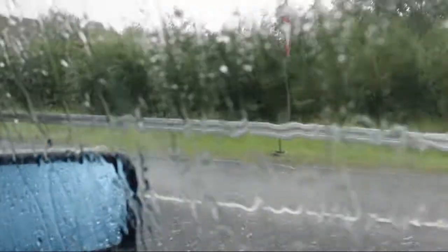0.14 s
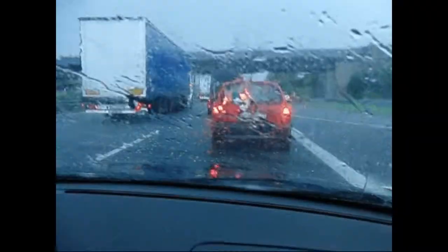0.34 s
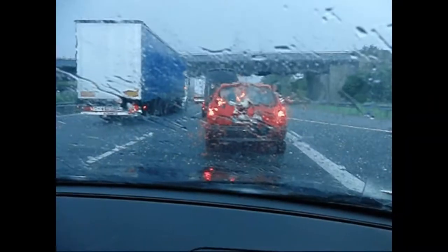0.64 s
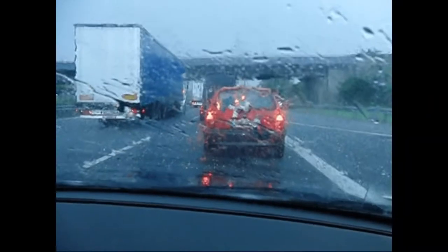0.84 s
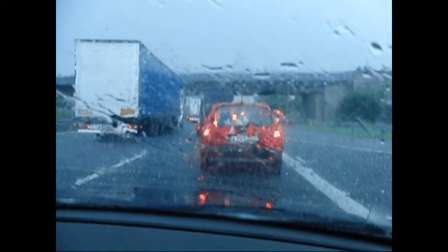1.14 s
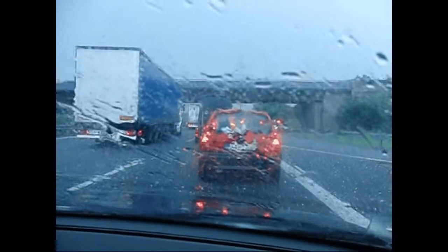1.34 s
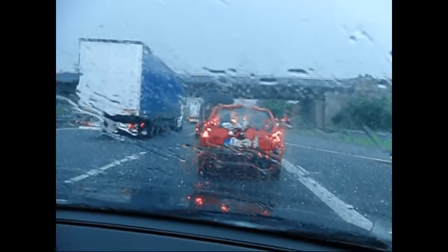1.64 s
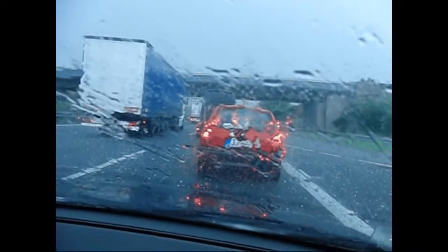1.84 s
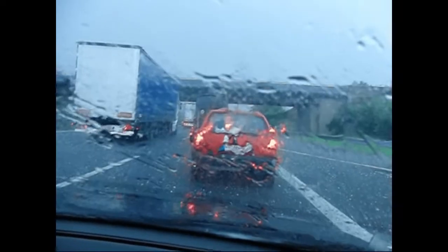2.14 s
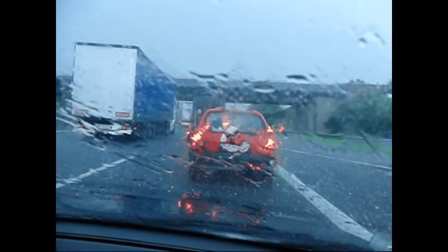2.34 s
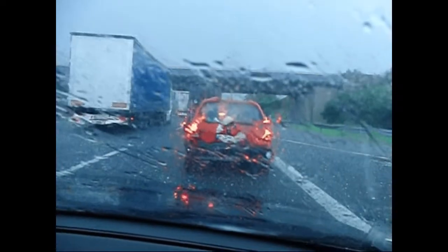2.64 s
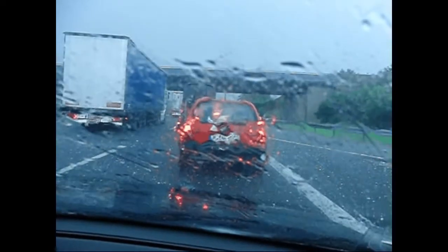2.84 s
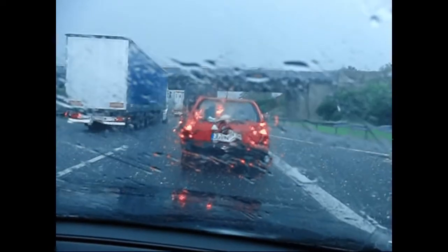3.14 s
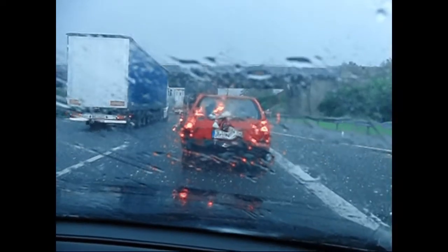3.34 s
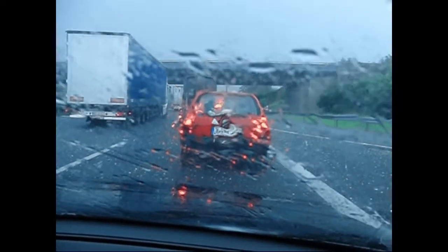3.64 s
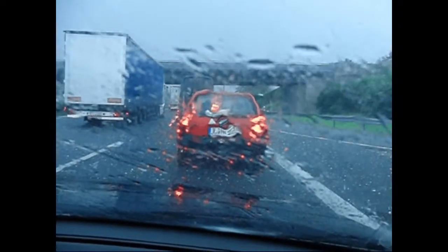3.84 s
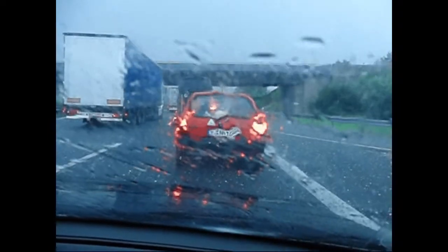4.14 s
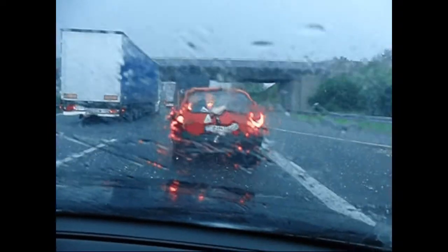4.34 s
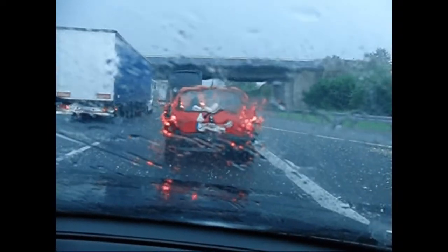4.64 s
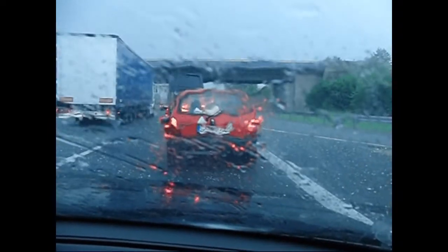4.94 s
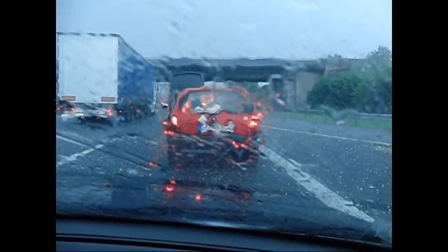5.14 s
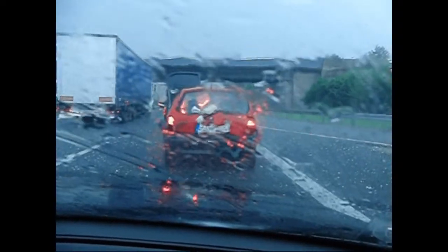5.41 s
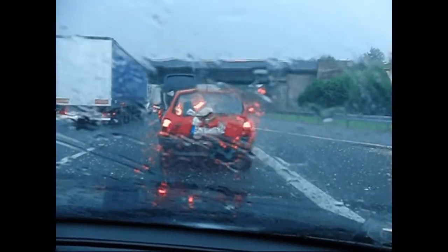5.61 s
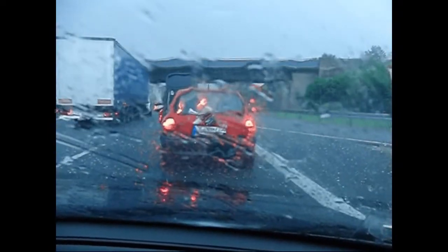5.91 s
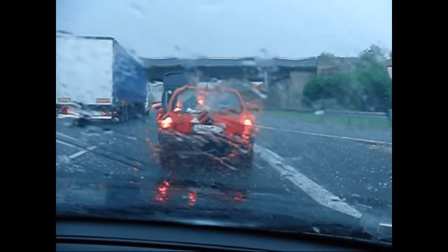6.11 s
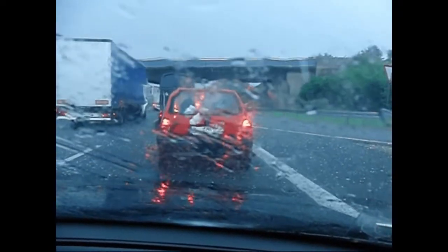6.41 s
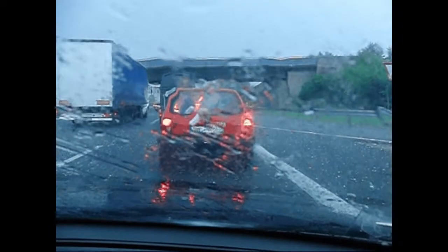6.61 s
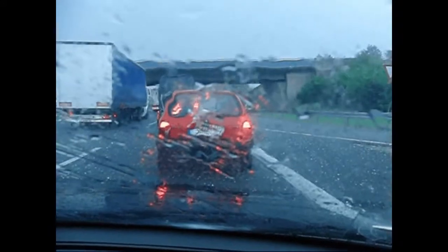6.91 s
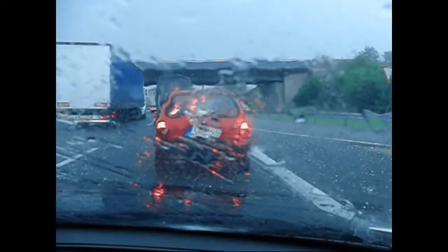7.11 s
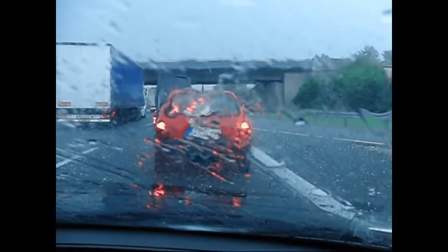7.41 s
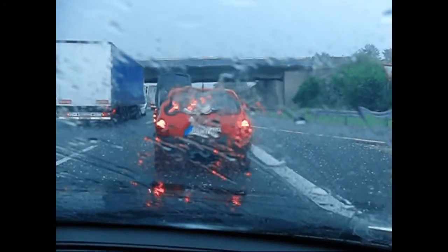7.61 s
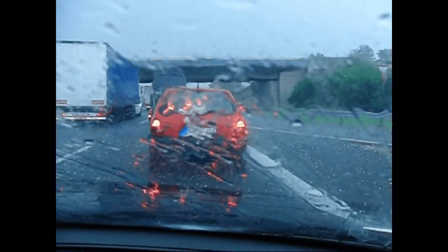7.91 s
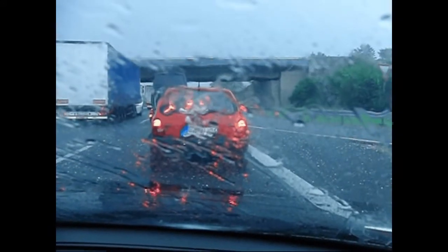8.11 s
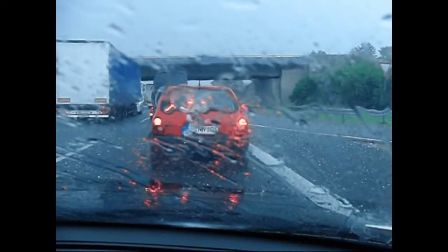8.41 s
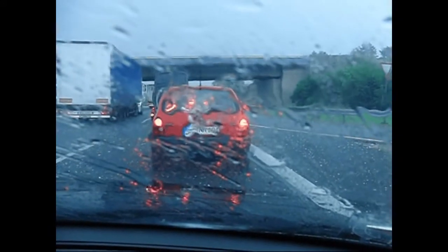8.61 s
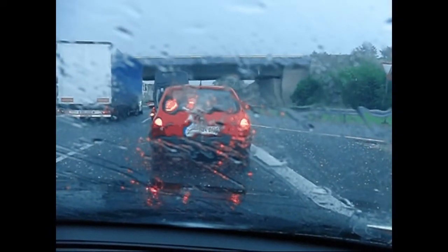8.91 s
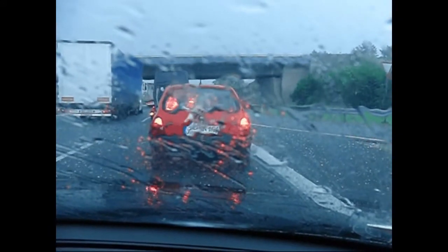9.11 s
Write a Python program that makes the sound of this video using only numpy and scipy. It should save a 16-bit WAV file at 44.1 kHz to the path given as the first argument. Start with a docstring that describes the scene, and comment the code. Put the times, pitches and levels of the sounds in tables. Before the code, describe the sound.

Inside a moving car, rain patters and tyres rumble while scattered hail thuds, taps and cracks on the roof and glass.

```python
"""Inside a car rolling slowly along a wet motorway, in hail and rain.
Big stones excite roof and windscreen by impact: the sheet flexes with a thud, its modes ring with a
knock, the ice fractures with a crack, and body panels boom. Small pellets tap and raindrops patter
without pause over road rumble and a faint hiss. For the first moment the brighter wash of rain at the
side window is heard."""
import sys
import numpy as np
from scipy import signal
from scipy.fft import rfft, irfft
from scipy.io import wavfile
from scipy.ndimage import uniform_filter1d, minimum_filter1d

SR = 44100
rng = np.random.default_rng(int(sys.argv[2]) if len(sys.argv) > 2 else 0)


def to_wav(s):
    """Save 16-bit WAV."""
    ch = np.atleast_2d(s).T  # columns
    pcm = np.round(np.clip(ch, -1, 1) * 32767)  # PCM
    wavfile.write(sys.argv[1], SR, pcm.astype(np.int16))


N = 408366
TIME = np.arange(N) / SR
AGE = np.arange(SR // 3) / SR  # time since an impact [s]
GLASS_HZ = 3050  # typical resonance of the windscreen

# spectrum of a sharp impact on glass: (frequency [Hz], relative level [dB])
CRACK_SPECTRUM = [(1120, -37), (1850, 2.5), (2180, 0.5), (2450, -4), (2720, -2.5), (3200, -8),
                  (7090, -34.5), (7930, -53.5), (8500, -71.5), (11000, -96), (18700, -120)]
# spectrum of rain and spray in the cabin: (frequency [Hz], relative level [dB])
PATTER_SPECTRUM = [(180, -30), (300, -3), (402, -6), (432, -8), (469, -6.5), (532, -9.5), (745, -10.5),
                   (985, -15), (1720, -21.5), (1980, -26.5), (2310, -25), (2480, -27.5), (3380, -35.5),
                   (4930, -42), (5700, -51), (8500, -62.5), (11000, -103), (18700, -120)]


def undb(db):
    """Amplitude ratio of a level in decibels."""
    return 10 ** (np.asarray(db) / 20)


def level(x, db):
    """Scale a steady sound to an rms level."""
    return x * undb(db) / np.sqrt(np.mean(x ** 2))


def blow(x, db, span_s=.04):
    """Scale a transient to the energy of a steady level held for span_s."""
    return x * undb(db) / np.sqrt(np.sum(x ** 2) / (span_s * SR))


def band(x, lo_hz, hi_hz, order=2):
    """Causal Butterworth band-pass."""
    return signal.sosfilt(signal.butter(order, [lo_hz, hi_hz], "band", fs=SR, output="sos"), x)


def through(x, response):
    """Convolution with an impulse response."""
    return signal.oaconvolve(x, response)[:len(x)]


def colour(points, size=1024):
    """Minimum-phase impulse response of a spectrum (frequency [Hz], level [dB])."""
    hz, db = np.transpose(points)
    gain = undb(np.interp(np.log(np.linspace(1, SR / 2, size // 2 + 1)), np.log(hz), db))
    cepstrum = irfft(np.log(gain))
    cepstrum[1:size // 2] *= 2
    cepstrum[size // 2 + 1:] = 0
    return irfft(np.exp(rfft(cepstrum)))


def wander(per_s):
    """Random modulation: Gaussian values joined by straight lines."""
    knots = rng.standard_normal(400)
    return np.interp(TIME * per_s, np.arange(len(knots)), knots)


def fade(t, t60):
    """Exponential damping by 60 dB in t60 seconds."""
    return np.exp(-np.log(1000) * np.maximum(t, 0) / t60)


def add(out, s, sound):
    """Superpose a sound starting at s seconds."""
    start = int(s * SR)
    out[start:start + len(sound)] += sound[:len(out) - start]


def shatter(crush_s, early_t60, tail_t60, tail_db):
    """Dense micro-impacts sum to noise that builds during the crush, drops, then lingers in the cabin."""
    rise = np.minimum(AGE / max(crush_s, 1 / SR), 1) ** 0.74
    after = AGE - crush_s
    fall = fade(after, early_t60 + 2 * crush_s) + undb(tail_db) * fade(after, tail_t60)
    return rng.standard_normal(len(AGE)) * rise * fall


def side_window(end_s=.289):
    """Rain at the side window merges into bright, fluttering broadband noise that stops abruptly."""
    # spectrum of the wash: (frequency [Hz], relative level [dB])
    spectrum = [(88, -2.5), (150, 6), (285, -2.5), (339, -3.5), (462, -3), (618, -4.5), (1020, -7.5),
                (1760, -18.5), (4140, -26), (6600, -32), (7710, -42), (11100, -41.5), (15500, -51)]
    wash = through(rng.standard_normal(N), colour(spectrum)) * undb(2 * wander(54.4))
    return level(wash, -30) * undb(3 - 17.4 * np.minimum(TIME, end_s)) * (TIME < end_s)


def road(patter_db, follow=0.41):
    """Forced vibration: tyres and engine rumble, at a level that partly follows the patter."""
    # spectrum of the rumble: (frequency [Hz], relative level [dB])
    spectrum = [(11, -30), (18, 2.5), (43, 0), (92, -2.5), (162, -5.5), (233, -7.5), (317, -14),
                (404, -17.5), (432, -20), (450, -18.5), (580, -62), (990, -120)]
    rumble = through(rng.standard_normal(N), colour(spectrum, size=16384))
    swell_db = follow * (patter_db - np.median(patter_db)) + 0.45 * wander(6.3)
    return level(rumble, -30.5) * undb(swell_db)


def steady_hiss():
    """Band-limited noise: a faint, steady high hiss in the cabin."""
    return level(band(through(rng.standard_normal(N), colour(PATTER_SPECTRUM)), 2100, 6200), db=-69)


def patter(patter_db, spots=12, roof_per_s=14, glass_per_s=221):
    """Shot noise over a wash of spray: sparse dull taps on the roof, dense fine drizzle on the glass."""
    drops = np.zeros(N)
    for hz, per_s in zip(np.geomspace(450, 3200, spots), np.geomspace(roof_per_s, glass_per_s, spots)):
        lands = rng.random(N) < per_s / SR
        size = undb(3 * np.minimum(rng.exponential(size=N), 3)) / np.sqrt(per_s)
        splash = shatter(.003, early_t60=.025, tail_t60=.13, tail_db=-11)
        drops += through(lands * size, band(splash, hz / 1.52, hz * 1.45))
    spray = rng.standard_normal(N) * undb(wander(5.3))
    rain = through(level(drops, 0) + level(spray, 3), colour(PATTER_SPECTRUM))
    return level(rain, db=2) * undb(patter_db)


def ticks(patter_db, per_s=45):
    """Tiny drops tick on the windscreen at independent random times, a Poisson process."""
    lands = rng.random(N) < per_s / SR
    size = undb(3 * np.minimum(rng.exponential(size=N), 2.5))
    splash = shatter(.001, early_t60=.012, tail_t60=.08, tail_db=-14)
    drops = through(lands * size, splash)
    glass = band(through(drops, colour(CRACK_SPECTRUM)), 3400, 6400)
    return level(glass, db=-28) * undb(patter_db)


def dent(hz, cycles):
    """Heavily damped oscillation: the struck spot swings up and dies within a few cycles."""
    return hz * AGE / cycles * np.exp(-hz * AGE / cycles) * np.sin(2 * np.pi * hz * AGE)


def strike(scatter, direct, crush_s, direct_db=4, hard_s=0.003):
    """Contact time divides the energy: a hard stone gives a clean blow, a slushy one mostly scatters."""
    return blow(scatter, 0) + blow(direct, direct_db) * np.exp(-crush_s / hard_s)


def thud(crush_s, usual_crush_s=0.0053):
    """Flexural vibration of the roof sheet, at nearly the same low pitch for every stone."""
    hz = 183 * (crush_s / usual_crush_s) ** -0.0017
    push = shatter(crush_s, early_t60=0.21, tail_t60=42 / hz, tail_db=11.5)
    return band(band(push, hz * 0.37, hz * 1.48), 70, 318, order=3)


def hollow(crush_s, usual_hz=510, scatter_oct=.25):
    """Resonance of the lined roof and cabin: a hollow note that differs from spot to spot."""
    hz = usual_hz * 2 ** (scatter_oct * rng.uniform(-1.1, 1))
    push = shatter(crush_s, early_t60=0.15, tail_t60=0.21, tail_db=-12)
    scatter = band(push, hz * 0.65, hz * 1.434, order=3)
    return strike(scatter, band(dent(hz, cycles=0.48), hz * 0.52, hz * 1.25), crush_s)


def panel(ring_db, longest_t60=.085):
    """Modal impulse response: each struck spot weights and detunes the panel modes differently."""
    # modes of roof and glass: (frequency [Hz], relative level [dB], t60 before the cap [s])
    modes = [(290, -9.5, 0.23), (547, -3.5, 0.086), (688, 8, 0.48), (917, 3.5, 0.3), (1050, -9, 0.36),
             (1060, -15.5, 0.15), (1340, -12.5, 0.75), (1460, -4.5, 0.034), (1600, -6.5, 0.45),
             (2070, -31.5, 0.34), (2730, -24, 0.15), (3607, -36, 0.28)]
    hz, db, t60 = np.transpose(modes)[:, :, None]
    weight, detune = rng.standard_normal((len(modes), 2)).T[:, :, None]
    envelopes = np.tanh(2 * weight) * undb(db) * fade(AGE, np.minimum(t60, longest_t60))
    tones = np.sin(2 * np.pi * hz * (1 + 0.07 * detune) * AGE)
    response = undb(ring_db) * (envelopes * tones).sum(axis=0)
    response[0] += 1  # the contact itself
    return response


def sheet_ring(crush_s, hz, t60=0.036):
    """Two close modes of the sheet beat together, driven for as long as the stone crushes."""
    # mode pair: (frequency over knock pitch [ratio], relative level [dB])
    pair = [(0.919, 0.5), (1.092, -1)]
    phases = rng.uniform(0, 2 * np.pi, len(pair))
    notes = sum(undb(db) * np.sin(2 * np.pi * hz * ratio * AGE + phase)
                for (ratio, db), phase in zip(pair, phases))
    return notes * np.minimum(AGE / crush_s, 1) * fade(AGE - crush_s, t60)


def knock(crush_s, hz, ring_db=-2, drive_s=0.014):
    """Driven resonance: the struck spot rings and feeds the panel modes; a longer push rings more."""
    push = shatter(crush_s, early_t60=0.081, tail_t60=0.26, tail_db=-7)
    scatter = band(through(push, panel(ring_db=-53)), hz * 0.67, hz * 1.265, order=1)
    scatter = band(scatter, 666, 1696, order=6)
    ring = blow(sheet_ring(crush_s, hz), ring_db) * (1 - np.exp(-crush_s / drive_s))
    return strike(scatter, band(dent(hz, cycles=0.75), 480, 3500), crush_s) + ring


def chips(per_s=200, t60=0.24):
    """Secondary impacts: splinters of ice land again as fine ticks that die away."""
    lands = rng.random(len(AGE)) < per_s / SR
    tick = band(rng.standard_normal(len(AGE)) * fade(AGE, .008), 3500, 7000, order=4)
    return through(lands * rng.uniform(.3, 1, len(AGE)) * fade(AGE, t60), tick)


def glass_ring(x, hz, q=5, ring_db=-6):
    """Resonance of the struck spot of windscreen picks one note out of the crack."""
    return x + undb(ring_db) * signal.lfilter(*signal.iirpeak(min(hz, 4500), q, fs=SR), x)


def crack(crush_s, tilt_db_per_oct, glass_hz, scatter_oct=0.29):
    """Brittle fracture: ice splinters on glass or paint, bursts as the crush ends and sheds chips."""
    hz, db = np.transpose(CRACK_SPECTRUM)
    octaves = np.log2(np.minimum(hz, 6000) / hz[0])
    ice = colour(np.column_stack([hz, db + tilt_db_per_oct * octaves]))
    scatter = shatter(crush_s, early_t60=.03, tail_t60=0.16, tail_db=-1)
    snap, burst = rng.standard_normal((2, len(AGE)))
    fracture = strike(scatter, snap * fade(AGE, 0.0062), crush_s, direct_db=4.5)
    add(fracture, crush_s, blow(burst * fade(AGE, 0.016), db=-6))
    spot_hz = glass_hz * 2 ** (scatter_oct * rng.uniform(-0.91, 1))
    return through(glass_ring(fracture + blow(chips(), db=-11.5), spot_hz), ice)


def stone(crush_s, knock_hz, knock_db, thud_db, bright_db):
    """One inelastic impact excites thud, hollow note, knock and crack at once."""
    hollow_db = knock_db + 0.35 * (thud_db - knock_db) - 1.5
    # the duller a stone lands, the higher its splintering and the ring of the glass
    dull_db = -4.5 - bright_db
    tilt_db_per_oct = -2 + 0.5 * dull_db
    glass_hz = GLASS_HZ * 2 ** (0.13 * dull_db)
    body = blow(thud(crush_s), thud_db) + blow(hollow(crush_s), hollow_db)
    body += blow(knock(crush_s, knock_hz), knock_db)
    return body + blow(crack(crush_s, tilt_db_per_oct, glass_hz), knock_db + bright_db)


def hailstones(gain_db=1.5):
    """Superposition of the big impacts that stand out from the patter."""
    # big stones: (time [s], crush time [s], knock pitch [Hz], relative knock level [dB],
    # relative thud level [dB], brightness as crack over knock [dB])
    impacts = [(.369, 0.006, 1261, -23.5, -31, -23.5), (.378, 0.0067, 1030, -24, -24.5, -11.5),
               (.556, 0.0026, 930, -43, -28.5, -4.5), (.629, 0.012, 1280, -37, -61, -5.5),
               (1.164, 0.0077, 1280, -42, -33.5, -2.5), (1.318, 0.003, 1020, -43, -54, -18),
               (1.436, 0.0031, 895, -44, -37.5, -22), (1.47, 0.0094, 975, -46.5, -30.5, -4.5),
               (1.531, 0.0052, 1010, -45.5, -28, -23), (1.653, 0.0021, 1020, -20.5, -22.5, -6.5),
               (1.765, 0.003, 710, -31, -24, -25), (1.793, 0.014, 700, -34.5, -33.5, -20),
               (1.915, 0.0016, 963, -47.5, -37.5, -13), (2.191, 0.0046, 955, -45, -37, -12),
               (2.217, 0.002, 1020, -47.5, -37.5, -2), (2.473, 0.0044, 1043, -45, -47, -7),
               (2.844, 0.017, 944, -36, -25, -7), (2.871, 0.008, 970, -34, -25, -15),
               (3.052, 0.012, 1378, -30.5, -45, -11), (3.067, 0.0051, 1365, -29.5, -53, -6),
               (3.256, 0.0016, 1100, -52, -46, 2.5), (3.345, 0.0098, 1260, -38, -51, -3),
               (3.605, 0.0012, 890, -18.5, -26, -12), (3.789, 0.016, 1294, -43.5, -55, -3.5),
               (4.013, 0.015, 1245, -34, -39.5, -4), (4.168, 0.012, 930, -49, -28, -9),
               (4.267, 0.0043, 1030, -46, -27, -12), (4.464, .0014, 930, -42.5, -57, -19),
               (4.538, 0.001, 970, -47, -50, -32), (4.582, 0.0019, 915, -33.5, -49, -19),
               (4.76, 0.012, 1124, -42, -47, -16), (4.857, 0.004, 1080, -40, -45, -13),
               (5.262, 0.018, 984, -46, -27, -18), (6.382, 0.0017, 940, -46, -31.5, -28),
               (6.592, 0.0025, 1140, -39.5, -43, -11), (6.644, 0.0084, 691, -24, -13.5, -20),
               (6.701, 0.0009, 920, -39.5, -29.5, -19), (7.090, 0.001, 850, -44.5, -39, -23),
               (7.116, 0.0022, 855, -43.5, -31, -12.5), (7.137, 0.0025, 930, -44, -37, -9),
               (7.89, 0.0051, 1000, -50, -32, -10), (8.008, 0.014, 1065, -42.5, -26, -6.5),
               (8.064, 0.0041, 910, -41.5, -32, -16), (8.272, 0.0074, 980, -35, -36, -8),
               (8.357, 0.0028, 1060, -45, -28.5, -12), (8.422, 0.025, 1284, -29, -30, -4),
               (8.6833, 0.0006, 1130, -46, -61, -13.5), (8.8004, 0.003, 1130, -18, -27.5, -7.5)]
    out = np.zeros(N)
    for s, *impact in impacts:
        add(out, s, stone(*impact))
    return out * undb(gain_db)


def booms(swell_s=0.0048):
    """Large body panels heave like pistons and pump the air in the cabin."""
    # panel heaves: (time [s], relative level [dB], t60 [s])
    heaves = [(0.369, -20.5, 0.56), (1.499, -21, 1.5), (1.72, -19, 0.11), (3.083, -20.5, 0.52),
              (6.65, -15.5, 0.47), (6.748, -22, 1.23)]
    out = np.zeros(N)
    for s, db, t60 in heaves:
        push = level(band(rng.standard_normal(N), 10, 105, order=3), db - 1.5)
        out += push * np.clip((TIME - s) / swell_s, 0, 1) * fade(TIME - s - swell_s, t60)
    return out


def pellets():
    """Low-energy impacts: each pellet ticks on the windscreen and taps the roof at its own pitch."""
    # small pellets: (time [s], tick level [dB], tap level [dB])
    impacts = [(0.7973, -59, -52), (0.884, -70, -51), (0.9906, -67, -53), (1.3643, -61, -59),
               (1.98, -61.5, -45), (2.038, -66, -60), (2.325, -71, -47.5), (2.416, -60.5, -48),
               (2.578, -67, -50), (2.656, -72, -49), (2.732, -69, -50), (3.524, -60, -45),
               (4.1962, -50, -49), (4.417, -56.5, -50), (4.638, -56, -40.5), (4.9733, -56, -44.5),
               (5.045, -66, -43.5), (5.15, -70, -51), (5.2836, -56.5, -46.5), (5.3276, -58, -43.5),
               (5.3832, -66, -56), (5.437, -59, -43), (5.522, -67, -48.5), (5.71, -62, -45.5),
               (5.927, -59, -45), (6.005, -64, -55), (6.057, -73, -53), (6.3943, -61, -50),
               (7.043, -75, -53), (7.2776, -55.5, -56), (7.382, -59.5, -49), (7.701, -64, -52),
               (8.638, -75, -51), (9.023, -59, -46), (9.136, -64, -48.5)]
    out = np.zeros(N)
    for s, tick_db, tap_db in impacts:
        tick = crack(crush_s=0.0059, tilt_db_per_oct=2, glass_hz=GLASS_HZ)
        tap = knock(crush_s=0.0032, hz=1000 * 2 ** rng.uniform(-0.39, .3))
        add(out, s, blow(tick, tick_db) + blow(tap, tap_db))
    return out


def scene():
    """The sound pressures of rain, hail, road and hiss add linearly in the cabin."""
    # level of the patter, dipping briefly after the loudest hits: (time [s], level [dB])
    patter_levels = [(0.3, -52.5), (0.37, -44.5), (0.85, -45), (1.25, -46), (1.69, -42.5), (2.02, -49.5),
                     (2.22, -50), (2.32, -46.5), (3.59, -41.5), (3.82, -56), (4.04, -46.5), (4.17, -45.5),
                     (5.14, -42), (5.62, -45.5), (6.26, -45), (6.59, -42), (6.74, -59.5), (6.91, -48.5),
                     (7.19, -43.5), (7.5, -42.5), (7.72, -48.5), (7.88, -43), (8.56, -43), (9.26, -47)]
    patter_db = np.interp(TIME, *np.transpose(patter_levels))
    rain = patter(patter_db) + ticks(patter_db) + side_window()
    return (hailstones() + pellets() + booms() + rain + road(patter_db) + steady_hiss())[None]


def record(dry, ceiling=1.0, notch_hz=1975, notch_q=14, notch_share=0.75, top_hz=15700):
    """Filtering and limiting: a narrow dip, peaks above the ceiling held down, the top treble cut."""
    notched = signal.lfilter(*signal.iirnotch(notch_hz, notch_q, fs=SR), dry)
    heard = dry + notch_share * (notched - dry)
    gain = ceiling / np.maximum(np.abs(heard), ceiling)
    gain = uniform_filter1d(minimum_filter1d(gain, size=49), size=49)
    return signal.sosfilt(signal.ellip(8, .2, 80, top_hz, fs=SR, output="sos"), heard * gain)


dry = scene()
out = record(dry)
to_wav(out)
```